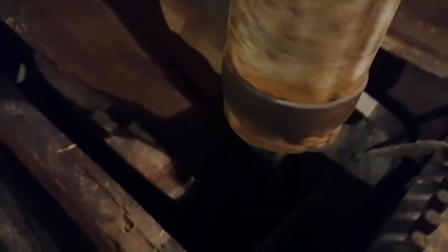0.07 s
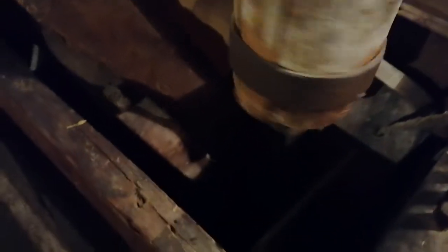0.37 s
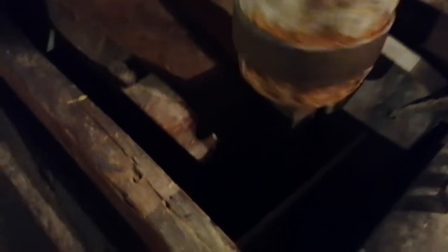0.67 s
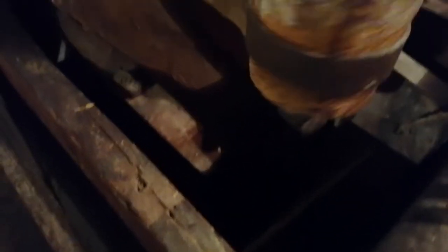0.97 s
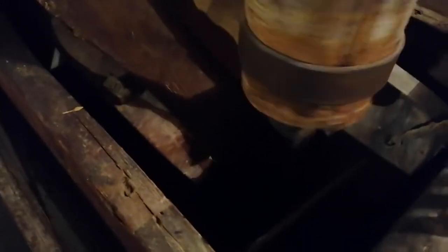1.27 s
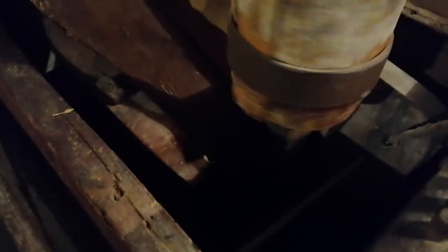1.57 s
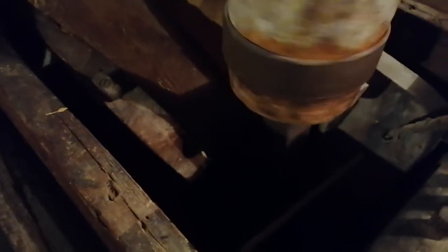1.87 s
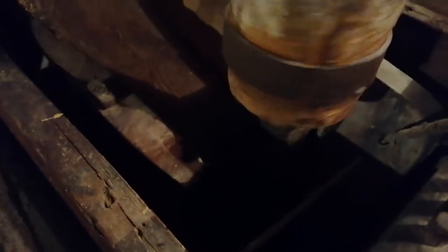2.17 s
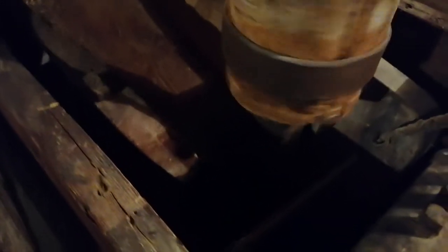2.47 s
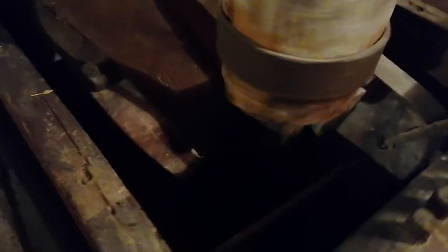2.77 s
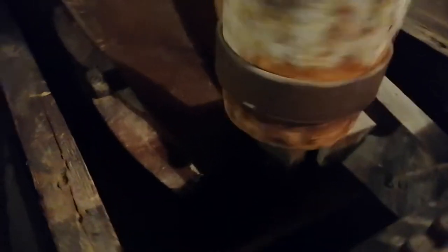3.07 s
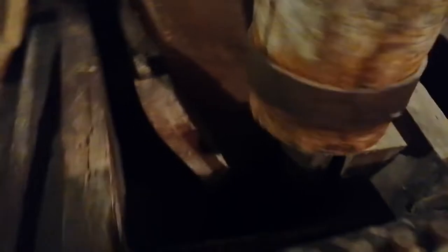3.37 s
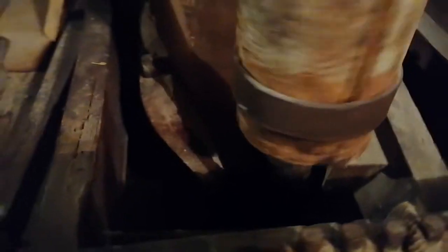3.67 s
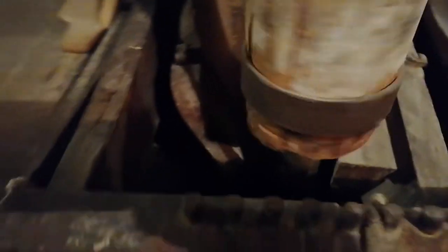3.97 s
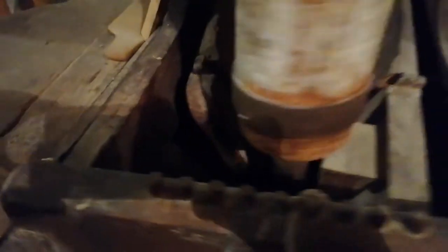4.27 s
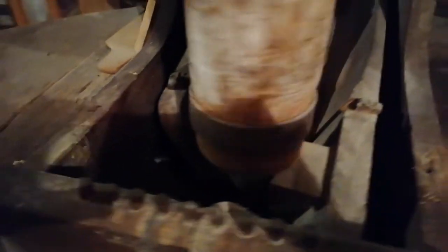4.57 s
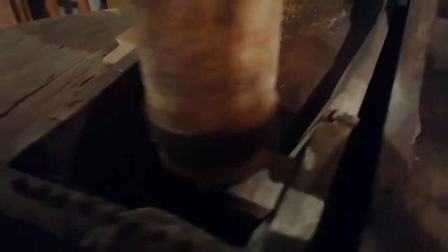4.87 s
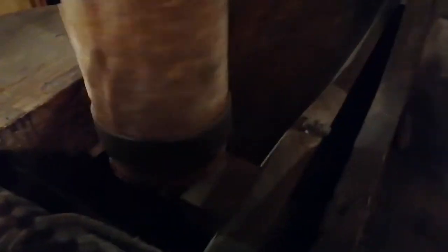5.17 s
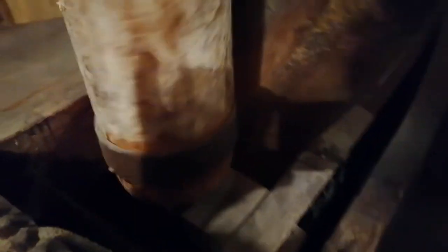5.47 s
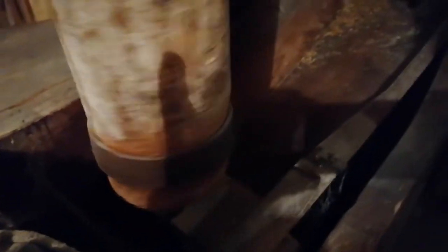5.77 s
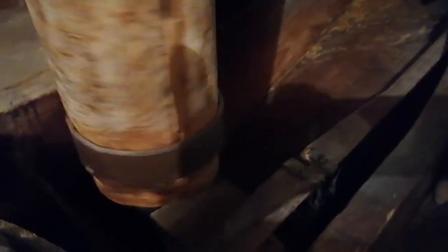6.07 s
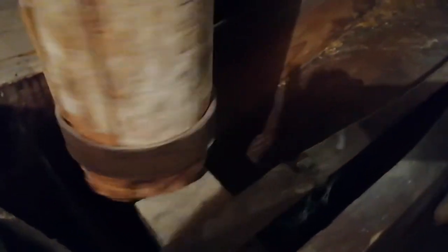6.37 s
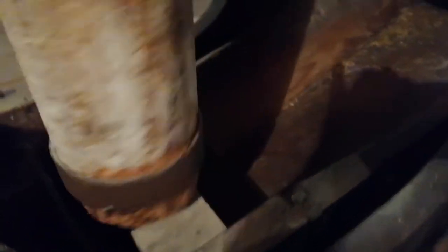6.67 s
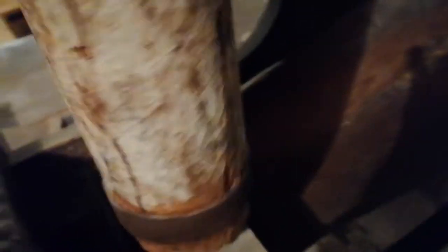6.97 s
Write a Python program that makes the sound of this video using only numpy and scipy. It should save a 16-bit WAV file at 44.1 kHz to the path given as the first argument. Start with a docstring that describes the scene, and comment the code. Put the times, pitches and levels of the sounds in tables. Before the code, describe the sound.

From the start, the wooden cogs of a turning mill shaft knock close by, about three times a second, in a repeating pattern of four unlike blows that gradually slows. The knocks are dull and hollow, ring briefly, and often bounce into a quick double. A low rumble and a dark wash of mill noise run underneath, swelling slightly near 0.5, 4 and 5.8 seconds. Dry wood snaps and ticks lightly, mostly in the first four seconds, over faint crackle. Loose timbers knock out of step around 2.5 seconds, with a harder knock and scrape at 2.8. From about 3.3 seconds the microphone moves around the shaft, shifting the tone and balance of the knocks. More stray knocks and short wooden scrapes gather between 5 and 7 seconds, the scrapes clearest at 5.7 and 7. The timber loft adds a short reverberation.

```python
"""Four unlike wooden cogs knock home and bounce on each turn of a mill shaft, about three a second
and slowing, heard on a walk round it. Each blow sends bending waves down the timbers and rings the
gear wheel; slack timbers knock out of step. Underneath, the drive rumbles through the floor in a
steady wash of mill noise. The dry wood scrapes, crackles and ticks, the timber loft rings briefly,
and gain control ducks the mix after hard knocks."""
import sys
import numpy as np
from scipy import signal
from scipy.fft import rfft, irfft, next_fast_len
from scipy.io import wavfile
from scipy.ndimage import uniform_filter1d

SR = 44100
rng = np.random.default_rng(int(sys.argv[2]) if len(sys.argv) > 2 else 0)


def unload_audio(sound):
    """Save the sound as a 16-bit wav file, at the path given as the first command line argument."""
    columns = np.transpose(np.atleast_2d(sound))
    # keep every value between -1 and 1, then stretch to whole-number steps
    steps = np.round(np.clip(columns, -1, 1) * 32767)
    wavfile.write(sys.argv[1], SR, steps.astype(np.int16))


N = 314874

# The cogs in striking order. Event levels in all tables come before their layer's trim.
# (lateness [s], level [dB], change per turn [dB], treble [dB], bass [dB], bounce [dB])
COG_VOICES = [(-.004, -21.5, 0.4, -20, -16, -2), (-.0022, -20.5, -1, -23, -12.5, -4.5),
              (-.0091, -24.5, -1, -31.5, -15.5, -24.5), (-.0005, -18, 0, -17, -17.5, -13.5)]
# How freely the cogs bounce, turn by turn: (bounce offset [dB])
BOUNCE_SLACK = [1, -1, 1, -2.5, 1, -8]
# Slack timbers knocking out of step: (time [s], level [dB], treble [dB], bass [dB])
TIMBER_KNOCKS = [(1.446, -34.5, -25, -17), (1.993, -41.5, -35, -28), (2.528, -25.5, -26, -12),
                 (2.585, -27, -22, -17), (2.677, -38, -42, -19), (2.793, -20.5, -30.5, -21),
                 (3.28, -42, -12, -19), (4.858, -33, -18, -11), (5.149, -29, -18.5, -7.5),
                 (5.222, -35.5, -46, -16), (5.354, -30, -39, -42), (5.667, -32.5, -27.5, -34),
                 (6.821, -34, 6, 6.5), (6.971, -28.5, 3.5, -27)]
# Perspective along the walk: (time [s], pan left [dB], room send [dB], bass [dB], treble [dB])
WALK = [(3.3, 0.5, -6.5, 0, 0), (3.8, -2.5, -10, -7.5, -2.5), (4.4, -5, -6, -0.5, -4),
        (4.8, -4, -6, -8.5, 2), (5.4, 2.5, -6.5, 4.5, 5.5), (6.1, -2.5, -4, -1.5, 1),
        (7.0, 0, -8.5, 5.5, -3.5)]
# When the listener reaches each of three spots: (time [s])
SPOT_ARRIVALS = [2.67, 5.12, 6.38]
# Routes of the bending wave along the timbers: (travel time at 1 kHz [s], level [dB])
TIMBER_ROUTES = [(.0015, -13), (.0048, 0), (.0078, -13), (.0115, -10)]
# Tone of the bending wave: (frequency [Hz], level [dB])
WAVE_EQ = [(40, -25), (100, 4), (190, -10.5), (320, -6), (385, 5.5), (600, 1), (1000, -2.5), (1300, -10.5),
           (1800, -16), (2300, -34.5), (4000, -42.5), (14000, -79)]
# Ring of the gear wheel: (frequency [Hz], t60 [s], level at spot 1 [dB], at spot 2 [dB], at spot 3 [dB])
WHEEL_MODES = [(249.3, 0.19, -29, -25, -17.5), (272.2, 0.23, -33.5, -37, -27), (390, 0.14, -13, -22.5, -32),
               (437.6, 0.17, -21, -13, -18), (504, 0.17, -24, -28, -24), (527, 0.075, -25, -24, -37),
               (613, 0.077, -20.5, -4, -21), (804, 0.12, -19, -33.5, -38), (1030.3, 0.06, -10, -14.5, -10),
               (1120, 0.084, -65, -12.5, -16), (1324, 0.079, -21, -37, -38), (1700, 0.054, -28, -27, -45),
               (1793, 0.11, -39, -45, -27.5)]
# Tone of the waves scattered through the frame: (frequency [Hz], level [dB])
SCATTER_EQ = [(90, -14.5), (200, -29), (245, -13.5), (325, -4), (390, -3), (650, -6), (1100, -13),
              (1750, -16), (2300, -27), (4000, -41.5), (14000, -82.5)]
# Stereo image, narrow in the bass and wide on top: (frequency [Hz], left-right correlation [0-1])
STEREO_LIKENESS = [(60, 0.98), (250, 0.88), (500, 0.76), (900, 0.098), (1500, 0.094), (3000, 0.077),
                   (9000, 0.033)]
# Tone of the shaking floor: (frequency [Hz], level [dB])
RUMBLE_EQ = [(12, -33.5), (26, 0.5), (40, -6), (60, 2.5), (85, -1), (105, 0), (128, 3.5), (160, -3.5),
             (200, -11), (245, -7), (290, -14), (500, -18.5), (1500, -69)]
# Fader ride of the rumble as the load changes: (time [s], level [dB])
DRIVE_LOAD = [(0.0, -43.5), (0.99, -51), (3.12, -46), (3.64, -52), (4.06, -47.5), (4.26, -53), (5.69, -43),
              (5.79, -38), (5.97, -50.5), (7.04, -48.5), (7.14, -43.5)]
# Swells where the shaft leans on its bearing: (time [s], level [dB])
BEARING_SURGES = [(.49, -42), (3.95, -41.5), (5.79, -47)]
# Tone of the background wash: (frequency [Hz], level [dB])
WASH_EQ = [(20, -8), (120, -2.5), (240, -1), (400, -10.5), (700, -13), (1000, -15.5), (1400, -22.5),
           (2100, -18), (3000, -24), (4500, -29), (7500, -32.5), (9400, -37), (10200, -43), (11800, -49),
           (12800, -67.5), (16000, -70)]
# Reverb decay of the loft: (frequency [Hz], t60 [s])
LOFT_DECAY = [(150, 0.34), (500, 0.56), (1400, 0.62), (2500, 0.45), (5000, 0.26), (10000, 0.23)]
# Featured scrapes, where the wood binds: (time [s], level [dB], pan left [dB], t60 [s])
SCRAPE_CUES = [(0.2019, -37, -2, 0.13), (2.798, -33, 0, 0.093), (3.4075, -46, -4, 0.15),
               (5.0889, -43.5, -10, 0.072), (5.22, -43, 0, 0.043), (5.408, -38.5, -3, 0.15),
               (5.6763, -32, -2, 0.15), (5.9537, -44, -2, 0.048), (6.3421, -39.5, 0, 0.098),
               (6.4659, -36.5, -2.5, 0.056), (6.9681, -31, 3, 0.22)]
# Tone of wood rubbing on wood: (frequency [Hz], level [dB])
SCRAPE_EQ = [(200, -25.5), (600, 2), (1100, -0.5), (1650, 2), (2400, -1), (3300, -8), (4300, -13.5),
             (6000, -17), (8500, -25.5), (12000, -52.5)]
# Featured snaps of dry wood: (time [s], level [dB], top end [dB], pan left [dB], ring [Hz], t60 [s])
TICK_CUES = [(0.296, -32.5, -33.5, -1, 5550, 0.15), (0.401, -35.5, -27, -0.5, 3090, 0.13),
             (0.6434, -44.5, -32, -5, 3650, 0.08), (0.8654, -37.5, -23, -1.5, 3660, 0.097),
             (0.8953, -38, -16.5, 0, 4440, 0.096), (1.4451, -36, -22, 0, 3400, .08),
             (1.635, -35, -20.5, 0, 5450, 0.21), (2.4384, -40.5, -19, -0.5, 3820, 0.072),
             (2.5196, -29.5, -32, -6, 3200, .08), (3.807, -28.5, -23.5, 0, 3420, 0.052),
             (4.709, -35, -28, -1, 3800, 0.12), (5.873, -45.5, -22.5, 0, 3120, 0.14)]
# Tone of a snap: (frequency [Hz], level [dB])
TICK_EQ = [(500, 8), (1500, 8), (2500, -3.5), (3400, -5.5), (4500, -7), (5800, -4), (8000, -6.5),
           (9300, -16.5), (10300, -20.5), (12000, -20.5), (14000, -46)]


def amp(db):
    return 10 ** (np.asarray(db) / 20)


def unit_rms(x):
    return x / np.sqrt(np.mean(x ** 2) + 1e-20)


def curve_at(points, hz):
    """A table's value at hz, on a log-frequency axis."""
    point_hz, value = np.transpose(points)
    return np.interp(np.log(hz + 1), np.log(point_hz + 1e-3), value)


def bin_hz(x):
    return np.fft.rfftfreq(x.shape[-1], 1 / SR)


def eq(x, points):
    """Minimum-phase EQ through points of (frequency [Hz], level [dB])."""
    size = next_fast_len(x.shape[-1] + 4096)
    log_gain = np.log(amp(curve_at(points, abs(np.fft.fftfreq(size, 1 / SR)))))
    response = np.exp(np.conj(signal.hilbert(log_gain)))
    return np.fft.ifft(np.fft.fft(x, size) * response).real[..., :x.shape[-1]]


def narrow_bass(x):
    """Two unrelated channels become alike in the bass, as at two close microphones."""
    a, b = rfft(x)
    likeness = np.clip(curve_at(STEREO_LIKENESS, bin_hz(x)), -1, 1)
    mid, side = a * np.sqrt((1 + likeness) / 2), b * np.sqrt((1 - likeness) / 2)
    return irfft([mid + side, mid - side], x.shape[-1])


def stereo_noise(samples):
    return narrow_bass(rng.standard_normal((2, samples)))


def place(mix, s, sound, level_db, pan_db):
    """Drops a stereo sound in at time s, panned, with its loudest 5 ms set to level_db."""
    part = mix[:, max(round(s * SR), 0):][:, :sound.shape[1]]
    loudest = np.sqrt(uniform_filter1d((sound ** 2).mean(0), size=220).max())
    gain = amp(level_db + np.array([[pan_db], [-pan_db]]) / 2) / loudest
    part += (gain * sound)[:, :part.shape[1]]


def perspective(s):
    """The walk at time s: (pan left [dB], room send [dB], bass [dB], treble [dB])."""
    walk_s, *columns = np.transpose(WALK)
    return [np.interp(s, walk_s, column) for column in columns]


def cog_strokes(starting_turn_s=1.18189, slowing_s=.02114):
    """The slowing wheel brings its cogs round in order: (time [s], turns made, rest of the cog's row)."""
    cogs = len(COG_VOICES)
    for k in range(int(N / SR / starting_turn_s * cogs)):
        turns = k / cogs
        late_s, *voice = COG_VOICES[k % cogs]
        s = starting_turn_s * turns + slowing_s * turns ** 2 + late_s
        if s < N / SR:
            yield s, turns, voice


def blows(uneven_db=.5, bounce_s=.0435, bounce_treble_db=-21, bounce_bass_db=-20):
    """Each cog strikes and bounces once, and the slack timbers join in: rows like TIMBER_KNOCKS."""
    for s, turns, (db, db_per_turn, treble_db, bass_db, bounce_db) in cog_strokes():
        strike_db, rebound_db = db + db_per_turn * turns + uneven_db * rng.standard_normal(2)
        slack_db = BOUNCE_SLACK[int(turns) % len(BOUNCE_SLACK)]
        yield s, strike_db, treble_db, bass_db
        yield s + bounce_s, rebound_db + bounce_db + slack_db, bounce_treble_db, bounce_bass_db
    yield from TIMBER_KNOCKS


def dispersion(hz, travel_s):
    """Timber smears a bending wave: speed goes as the root of frequency, so treble arrives first."""
    return np.exp(-4j * np.pi * travel_s * np.sqrt(1000 * hz))


def bending_wave(t, wander=0.059, stereo_lag_s=.00008):
    """The attack of a knock: one blow arriving by several routes through the timbers."""
    hz, spectrum = bin_hz(t), 0
    for reflections, (travel_s, db) in enumerate(TIMBER_ROUTES):
        # travel times vary at random from blow to blow, so each knock has its own hollow colour
        stretch, side = rng.uniform(-1.085, 1, 2)
        route = dispersion(hz, travel_s * (1 + wander * stretch))
        # each reflection flips the wave and comes from a random side
        stereo_lag = np.exp(2j * np.pi * hz * side * stereo_lag_s * np.array([[-1], [1]]))
        spectrum = spectrum + (-1) ** reflections * amp(db) * stereo_lag * route
    wave = irfft(amp(curve_at(WAVE_EQ, hz)) * spectrum, len(t))
    return wave / abs(wave).max()


def fade_in(t, rise_s):
    return 1 - np.exp(-(t / rise_s) ** 2)


def wheel_ring(t, spot_weights, skew_rad_per_khz=0.59):
    """The struck wheel rings in damped modes; high ones differ more in phase from left to right."""
    hz, t60, *spot_db = np.transpose(WHEEL_MODES)
    modes = amp(-60 * t / t60[:, None]) * np.exp(2j * np.pi * hz[:, None] * t)
    skew = skew_rad_per_khz * hz / 1000 * rng.standard_normal((2, len(hz)))
    strengths = amp(spot_weights @ spot_db) * np.exp(1j * skew)
    return (strengths @ modes).real * fade_in(t, rise_s=0.0012)


def frame_scatter(t, spot_weights, spot_paths, t60=0.2, burst_s=0.01, burst_db=-1, variation=.45):
    """Waves scatter through the frame: a thick burst, then a short tail, changing with spot and blow."""
    echoes = np.tensordot(np.sqrt(spot_weights), spot_paths, 1)
    echoes += variation * rng.standard_normal((2, len(t)))
    decay = amp(-60 * t / t60) + amp(burst_db) * np.exp(-t / burst_s)
    return unit_rms(eq(narrow_bass(echoes), SCATTER_EQ)) * decay * fade_in(t, rise_s=0.0024)


def knocks(trim_db=-4.5, ring_db=1, scatter_db=-16, mid_db=-21, lead_s=.0028):
    """Each blow layers bending wave, wheel ring and frame scatter; returns direct sound and room send."""
    t = np.arange(12288) / SR
    spots = len(SPOT_ARRIVALS)
    spot_paths = rng.standard_normal((spots, 2, len(t)))
    fades = fade_in(t, rise_s=.001) * np.cos(np.pi / 2 * t / t[-1])
    main_route = dispersion(bin_hz(t), TIMBER_ROUTES[1][0])
    direct, send = np.zeros((2, 2, N))
    for s, db, treble_db, bass_db in blows():
        pan_db, room_db, bass_lift_db, treble_lift_db = perspective(s)
        bass_db, treble_db = bass_db + bass_lift_db, treble_db + treble_lift_db
        spot_weights = np.array([np.interp(s, SPOT_ARRIVALS, row) for row in np.eye(spots)])
        ring = amp(ring_db) * wheel_ring(t, spot_weights)
        scatter = amp(scatter_db) * frame_scatter(t, spot_weights, spot_paths)
        # ring and scatter follow the main wave down the same timber
        body = irfft(rfft(ring + scatter) * main_route)
        knock = fades * (bending_wave(t) - body)
        # a hard contact is bright; a soft one keeps falling towards the top
        top_db = min(treble_db, 2 * treble_db - mid_db)
        knock = eq(knock, [(130, mid_db), (260, bass_db), (380, mid_db), (850, mid_db),
                           (1400, treble_db), (2400, top_db)])
        place(direct, s - lead_s, knock, db + trim_db, pan_db)
        place(send, s, knock, db + room_db + trim_db, 0)
    return direct, send


def drive_rumble(trim_db=-0.5, steadiness=0.67, surge_s=0.032):
    """The low bed: the drive shakes the floor, swelling with the load and in a few short surges."""
    t = np.arange(N) / SR
    shake = unit_rms(eq(stereo_noise(N), RUMBLE_EQ))
    power = uniform_filter1d((shake ** 2).mean(0), size=4000) + 1e-6
    levelled = shake / power ** (steadiness / 2)
    load = amp(np.interp(t, *np.transpose(DRIVE_LOAD)) + trim_db)
    surges = sum(amp(db) * np.exp(-((t - s) / surge_s) ** 2) for s, db in BEARING_SURGES)
    return levelled * np.hypot(load, surges)


def mill_wash(level_db=-56):
    """Room tone: the steady, dark wash of the running mill."""
    return amp(level_db) * unit_rms(eq(stereo_noise(N), WASH_EQ))


def loft_reverb(send, tails=4, build_s=.018, cycle_s=1.5):
    """Diffuse echoes build, then die band by band; tails crossfade as shaft and listener move."""
    out = 0
    for k in range(tails):
        hz, t, noise = signal.stft(stereo_noise(SR), SR, nperseg=256)
        envelope = amp(-60 * t / curve_at(LOFT_DECAY, hz)[:, None]) * (1 - np.exp(-t / build_s))
        tail = signal.istft(noise * envelope, SR, nperseg=256)[1]
        tail /= np.sqrt(np.mean(abs(rfft(tail)[:, 300:2000]) ** 2))  # unity gain in the mids
        crossfade = np.maximum(np.cos(2 * np.pi * (np.arange(N) / SR / cycle_s - k / tails)), 0)
        out = out + signal.fftconvolve(send * crossfade, tail, axes=1)[:, :N]
    return out


def grains(t, t60, spread_db):
    """Wood grit: a dying burst of tiny slips of uneven size."""
    size_db = spread_db * np.minimum(rng.exponential(1, len(t)), 4)
    return narrow_bass(rng.standard_normal((2, len(t))) * amp(size_db - 60 * t / t60))


def cog_rubs(level_db=-49.5, db_per_turn=0.5, spread_db=2, within_s=.07, t60=0.082):
    """A light rub follows each stroke, stronger as the wheel drags: rows like SCRAPE_CUES."""
    for s, turns, _ in cog_strokes():
        start_s = s + within_s * rng.random()
        db = level_db + db_per_turn * turns + spread_db * rng.standard_normal()
        yield start_s, db, perspective(s)[0], t60


def scrapes(trim_db=-6, slips_per_s=260, slip_db=9, slip_s=0.00028):
    """A cog slides in quick uneven slips, each a spike in the grit."""
    t, out = np.arange(SR // 2) / SR, np.zeros((2, N))
    for s, db, pan_db, t60 in [*SCRAPE_CUES, *cog_rubs()]:
        triggers = rng.random(len(t)) < slips_per_s / SR
        slips = signal.lfilter([1], [1, -np.exp(-1 / (slip_s * SR))], triggers)
        rub = grains(t, t60, spread_db=2) * (1 + amp(slip_db) * slips)
        place(out, s, eq(rub, SCRAPE_EQ), db + trim_db, pan_db)
    return out


def joint_crackle(per_s=12, level_db=-67, t60=0.092):
    """The loaded joints fidget in a faint random crackle."""
    t = np.arange(SR // 8) / SR
    triggers = rng.random(N) < per_s / SR
    clicks = triggers * amp(1.8 * np.minimum(rng.exponential(1, N), 3))
    crackle = signal.oaconvolve(clicks[None], grains(t, t60, spread_db=-2.0), axes=1)[:, :N]
    return amp(level_db) * unit_rms(eq(crackle, SCRAPE_EQ))


def small_ticks(level_db=-47, spread_db=3, top_db=-25, width_db=5, ring_hz=3600, t60=.08, count=12):
    """Faint snaps sprinkled at chance moments: rows like TICK_CUES."""
    for when, strength, side, pitch in rng.uniform(-1, 1, (count, 4)):
        s = (when + 1) / 2 * N / SR
        yield s, level_db + spread_db * strength, top_db, width_db * side, ring_hz * (1 + .15 * pitch), t60


def ticks(trim_db=-8, mid_db=-18, attack_db=3, attack_s=0.00067, ring_db=10, ring_q=18):
    """Dry wood snaps, and the small piece rings briefly at its first two bending modes."""
    t, out = np.arange(SR // 4) / SR, np.zeros((2, N))
    attack = 1 + amp(attack_db) * np.exp(-t / attack_s)
    for s, db, top_db, pan_db, hz, t60 in [*TICK_CUES, *small_ticks()]:
        snap = eq(grains(t, t60, spread_db=7.5) * attack, TICK_EQ)
        modes = [signal.iirpeak(min(mode_hz, 9300), ring_q, SR) for mode_hz in (hz, 2.7 * hz)]
        ring = sum(signal.lfilter(*mode, snap) for mode in modes)
        tick = eq(snap + amp(ring_db) * ring, [(3800, mid_db), (7000, top_db)])
        place(out, s, tick, db + trim_db, pan_db)
    return out


def scene(tick_send_db=-8, scrape_send_db=-3):
    """Knocks, ticks and scrapes feed the loft; crackle, rumble and wash sit dry beneath them."""
    direct, knock_send = knocks()
    snaps, rubs = ticks(), scrapes()
    room = loft_reverb(knock_send + amp(tick_send_db) * snaps + amp(scrape_send_db) * rubs)
    return direct + snaps + rubs + room + joint_crackle() + drive_rumble() + mill_wash()


def record(dry, threshold_db=-29, duck_db_per_db=.35, detector_fall_db_per_s=12, cutoff_hz=15200):
    """Gain control dips a little on hard knocks and recovers slowly; a steep low-pass trims the top."""
    smoother = np.ones(256) / 256
    power_db = 10 * np.log10(signal.lfilter(smoother, 1, (dry ** 2).mean(0)) + 1e-12)
    fall_db = np.arange(N) / SR * detector_fall_db_per_s
    held_db = np.maximum.accumulate(power_db + fall_db) - fall_db
    over_db = np.maximum(held_db - threshold_db, 0)
    ducked = dry / amp(duck_db_per_db * signal.lfilter(smoother, 1, over_db))
    low_pass = signal.firwin(511, cutoff_hz, window=("kaiser", 9), fs=SR)
    return signal.oaconvolve(ducked, low_pass[None], "same")


dry = scene()
out = record(dry)
unload_audio(out)
```